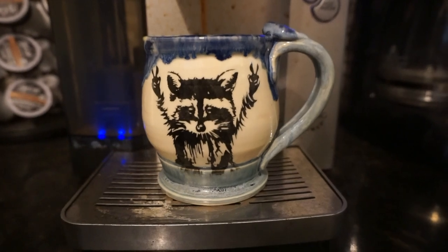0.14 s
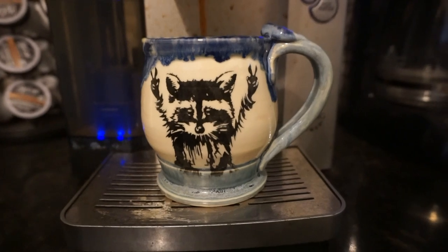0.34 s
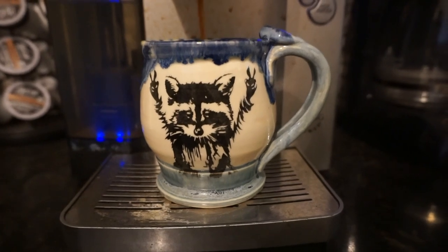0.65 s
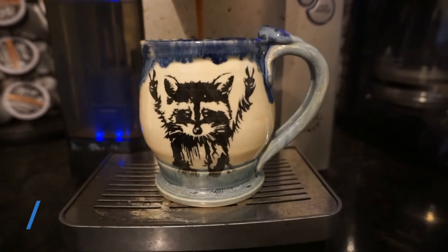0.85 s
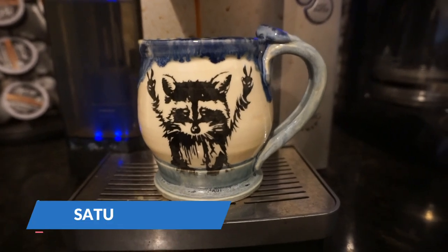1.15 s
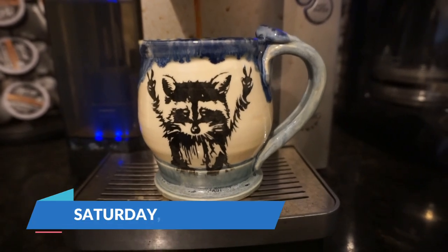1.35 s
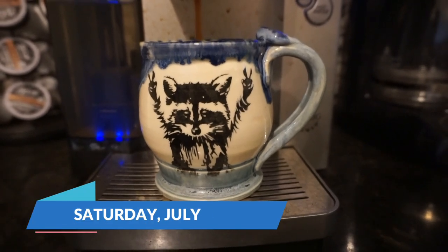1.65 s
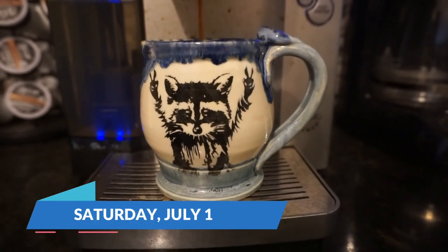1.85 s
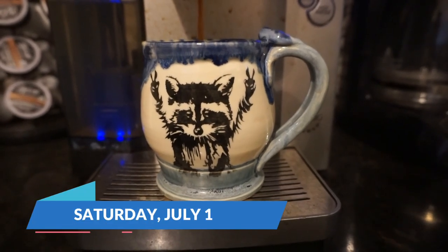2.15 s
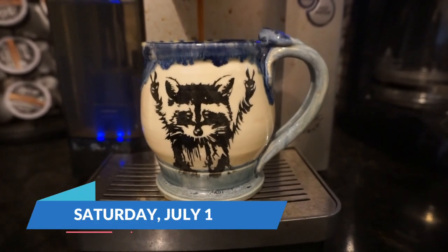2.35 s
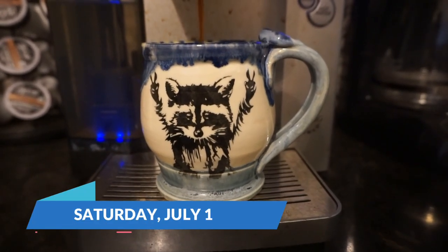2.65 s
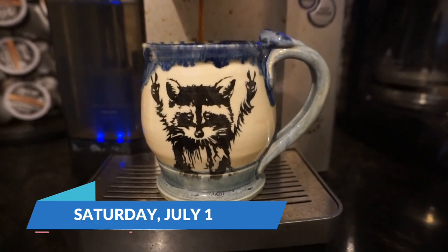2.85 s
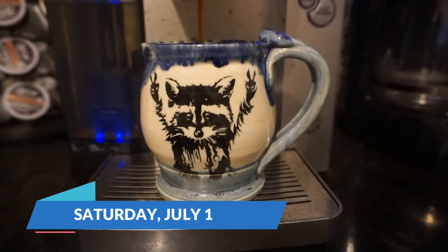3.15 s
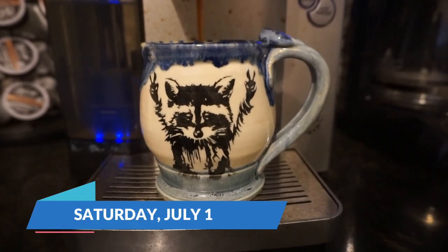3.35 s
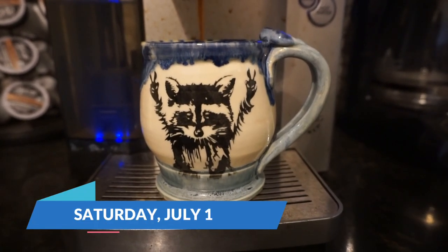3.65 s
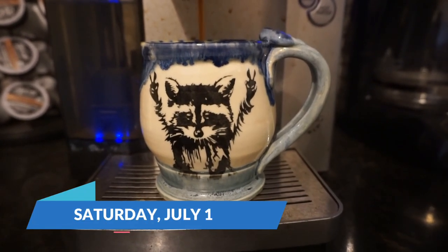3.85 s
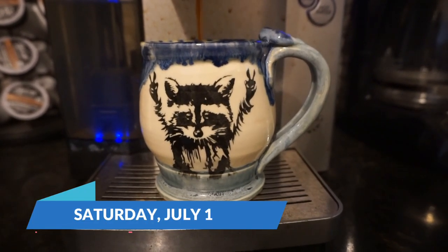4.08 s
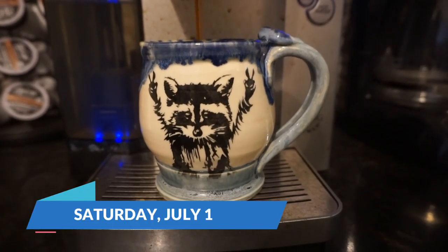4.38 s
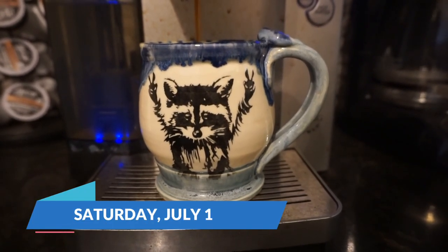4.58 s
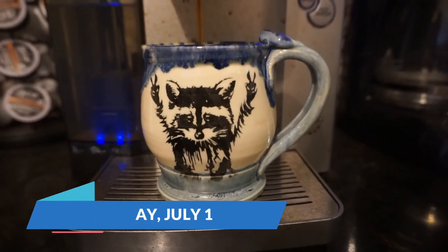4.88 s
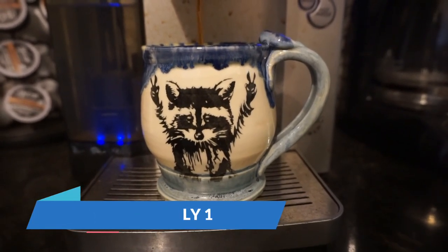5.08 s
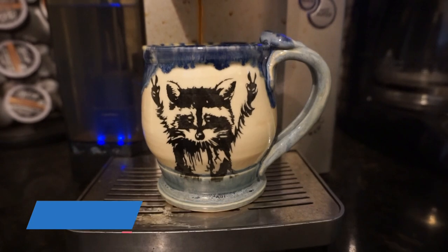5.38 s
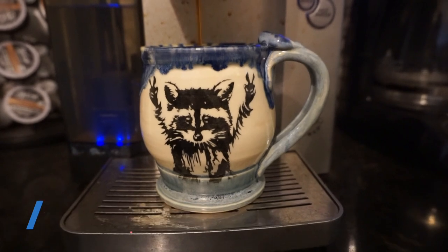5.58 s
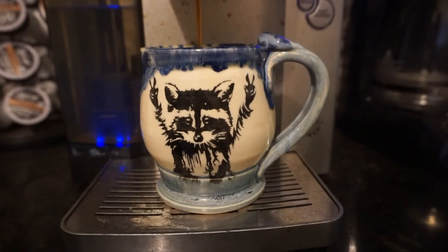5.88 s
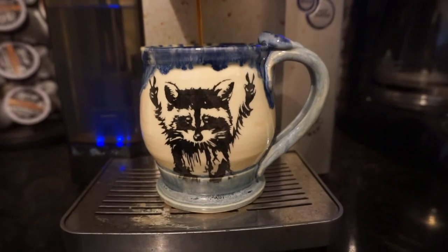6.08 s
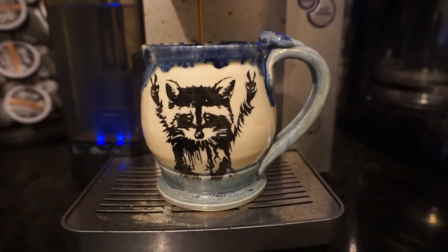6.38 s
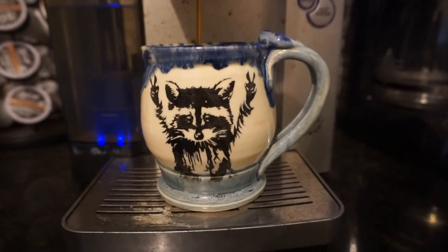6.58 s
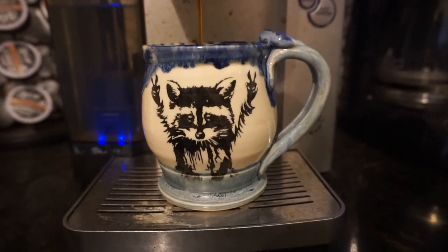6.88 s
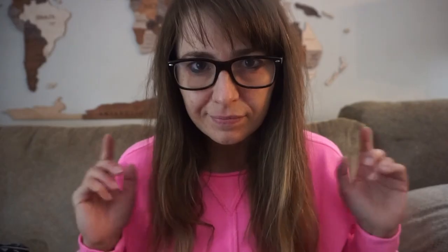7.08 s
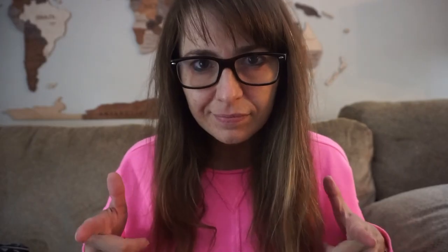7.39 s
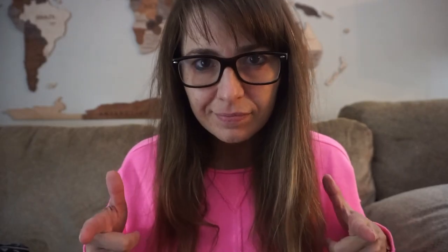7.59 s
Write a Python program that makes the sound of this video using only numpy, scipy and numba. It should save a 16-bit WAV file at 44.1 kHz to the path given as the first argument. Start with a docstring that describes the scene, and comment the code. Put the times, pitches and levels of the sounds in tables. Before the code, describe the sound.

A close, slightly wide stereo kitchen sound. From 0 s a thin stream of coffee strikes the bare bottom of a ceramic mug: a bright, uneven spatter with tiny spits of spray, briefly breaking and swelling, and overlapping gurgling notes that ring inside the vessel. A low, gently wavering pump hum and soft room tone continue underneath. Around 1.4 s a stronger gurgle and a first rounder plop stand out; from 1.8 to 3 s the hiss recedes as a pool deepens. From about 2.5 s hollow, mid-pitched bubble plops arrive in dense irregular clusters, each short with a slight upward bend, mixed with sharp little drips and splashes. They stay busy from 3 to 6.9 s, with slight lulls after 6 s. The echoes are short and hard. At about 7 s the pour and hum cut off suddenly, leaving a faint, soft living-room tone with a barely audible low hum until the end.

```python
"""In a kitchen, close up, a thin stream of coffee falls into a ceramic mug; near the end we cut to a quiet living room.
First the stream spatters on the bare bottom: shaped noise, swarms of tiny grains and gurgling bubble notes.
Then it plunges into the pool: short decaying sines plop, drip and spit, and the mug's resonances colour them.
The brewer's pump hums as six wavering tones over noise for room tone; the living room is soft noise and one hum."""
import sys
import numpy as np
from scipy import signal
from scipy.fft import rfft, irfft, next_fast_len
from scipy.io import wavfile
from scipy.ndimage import uniform_filter1d
from numba import njit

SR = 44100
rng = np.random.default_rng(int(sys.argv[2]) if len(sys.argv) > 2 else 0)


def field_ratio(decibels):
    """Amplitude ratio for a level in dB (20 dB per decade); scalars and array-likes work."""
    return 10 ** (np.asarray(decibels, dtype=float) / 20)


def waveform_to_disk(signal):
    """Save audio, clipped to [-1, 1], as 16-bit WAV at the path in sys.argv[1]."""
    frames = np.transpose(np.atleast_2d(signal))
    scaled = np.clip(frames, -1, 1) * 32767
    samples = np.round(scaled).astype(np.int16)
    wavfile.write(sys.argv[1], SR, samples)


N = 340829

# Large bubbles trapped by the stream, ahead of the mug: (nominal peak time [s], strength [dB], starting pitch [Hz])
PLOPS = [(0.733, -18, 1120), (0.82, -17.5, 1090), (1.091, -19, 870), (1.371, -11.5, 575),
         (1.512, -15.5, 600), (1.76, -19, 755), (2.0, -20, 800), (2.054, -18, 746), (2.066, -16, 1120),
         (1.808, -21, 990), (2.125, -18.5, 830), (2.16, -9.5, 850), (2.188, -17.5, 825), (2.42, -18, 830),
         (2.549, -6.5, 807), (2.588, -11.5, 920), (2.609, -10, 757), (2.638, -7, 774), (2.784, -23, 1190),
         (2.799, -13.5, 740), (2.849, -22, 1190), (3.084, -21, 760), (2.92, -7, 750), (2.937, -9.5, 794),
         (2.959, -9.5, 760), (2.973, -9.5, 744), (2.996, -13, 780), (3.103, -12.5, 620), (3.132, -18, 710),
         (3.229, -9, 695), (3.292, -19, 720), (3.32, -14, 780), (3.328, -15, 820), (3.341, -6.5, 830),
         (3.426, -10.5, 800), (3.447, -12, 766), (3.469, -13, 750), (3.526, -15.5, 776), (3.593, -15, 777),
         (3.614, -15.5, 730), (3.631, -5, 662), (3.699, -15.5, 800), (3.728, -16, 750), (3.872, -5.5, 736),
         (3.896, -12, 740), (3.916, -14.5, 774), (3.998, -11, 750), (4.102, -12, 820), (4.119, -4.5, 766),
         (4.151, -10, 755), (4.206, -11.5, 755), (4.244, -9, 790), (4.263, -7.5, 774), (4.298, -13, 755),
         (4.328, -12.5, 774), (4.346, -17, 760), (4.378, -12.5, 747), (4.466, -13, 754), (4.518, -12, 760),
         (4.531, -21, 810), (4.573, -4.5, 682), (4.602, -11, 755), (4.651, -12, 810), (4.732, -18, 785),
         (4.746, -6, 630), (4.764, -4.5, 620), (4.788, -10.5, 630), (4.824, -6.5, 817), (4.839, -11.5, 850),
         (4.922, -16, 700), (4.977, -7.5, 740), (5.045, -12.5, 700), (5.055, -10.5, 697), (5.117, -6, 763),
         (5.14, -15, 686), (5.147, -9.5, 790), (5.194, -5, 650), (5.233, -6, 660), (5.267, -6, 776),
         (5.284, -10, 632), (5.368, -6.5, 714), (5.392, -14, 850), (5.409, -10, 800), (5.447, -5, 658),
         (5.471, -8.5, 650), (5.497, -5.5, 670), (5.577, -15, 737), (5.59, -15, 746), (5.966, -17, 760),
         (5.603, -7.5, 666), (5.706, -16, 760), (5.728, -13.5, 733), (5.753, -20, 730), (5.792, -7, 557),
         (5.834, -15.5, 674), (5.866, -19, 746), (6.275, -20, 755), (6.294, -20, 764), (5.815, -14.5, 780),
         (5.9, -16, 760), (5.92, -8, 750), (5.951, -7.5, 784), (5.982, -4.5, 734), (6.055, -10.5, 720),
         (6.101, -11, 714), (6.19, -13, 725), (6.215, -14, 675), (6.329, -15.5, 744), (6.46, -22, 680),
         (6.483, -6, 743), (6.518, -8, 704), (6.551, -13.5, 770), (6.579, -11.5, 780), (6.593, -9.5, 600),
         (6.606, -16.5, 750), (6.638, -12, 760), (6.762, -9.5, 620), (6.771, -11.5, 697),
         (6.794, -6.5, 670), (6.815, -12.5, 740), (6.84, -12.5, 850), (6.71, -20, 750), (6.728, -22, 745),
         (6.889, -19, 756), (6.909, -19, 760), (6.947, -17.5, 724), (6.42, -21, 740), (4.5, -18, 1120),
         (6.039, -17.5, 1020), (6.929, -16, 776), (6.978, -5, 912)]
# Small bubbles and droplets, ahead of the mug: (nominal peak time [s], strength [dB], starting pitch [Hz])
DROPS = [ (0.771, -11, 4600), (0.792, -10.5, 2950), (0.94, -15, 4000), (1.042, -16, 2090),
         (1.175, -12, 2180), (1.298, -14.5, 2520), (1.43, -11.5, 2240), (1.536, -8, 4830),
         (1.807, -7, 2450), (1.808, -16, 4000), (1.885, -11, 2570), (2.157, -11.5, 2350),
         (2.418, -12, 3120), (2.499, -17, 2630), (2.635, -14.5, 2460), (2.723, -12.5, 3400),
         (2.782, -9.5, 3400), (3.317, -16.5, 2520), (3.365, -11.5, 3380), (3.697, -12.5, 4000),
         (3.791, -12, 3640), (3.981, -13.5, 2600), (3.994, -20, 3800), (4.099, -9.5, 3540),
         (4.148, -12.5, 3300), (4.822, -18, 3730), (4.885, -19, 2250), (4.907, -21, 2270),
         (5.153, -16.5, 2570), (5.342, -19, 2950), (6.213, -18.5, 2230), (5.703, -17, 3880),
         (5.751, -19, 3740), (5.917, -11, 3170), (6.149, -24.5, 3870), (6.054, -11.5, 2850),
         (6.728, -15.5, 2950), (1.112, -14, 2540), (1.24, -14.5, 2560), (2.034, -16, 3950),
         (2.25, -15.5, 2640), (2.465, -20, 2550), (2.586, -21, 2650), (2.681, -16, 4000),
         (2.847, -18.5, 2530), (2.994, -19, 2600), (3.129, -23, 3600), (3.424, -22, 2600),
         (3.544, -19.5, 2610), (3.59, -22.5, 2150), (3.628, -18, 3020), (4.203, -27, 2650),
         (5.114, -25, 2620), (5.231, -22, 2870), (5.263, -20, 2800), (5.283, -18.5, 4000),
         (5.331, -21, 3680), (5.366, -20, 3200), (5.617, -20, 4000), (5.809, -18.5, 1720),
         (5.883, -22, 2780), (5.948, -16, 4000), (6.481, -18, 2500), (6.576, -20, 3950), (6.792, -23, 2370),
         (6.885, -20.5, 2880), (6.976, -15.5, 4000)]
# Bursting spray, ahead of the mug: (nominal time [s], strength [dB], starting pitch [Hz])
SPITS = [(0.1765, -20, 15360), (0.2613, -25, 14900), (0.2982, -14.5, 9900), (0.3998, -12, 8640),
         (0.437, -21, 9170), (0.6843, -25, 12100), (0.8629, -27, 12000), (0.9053, -23, 9800),
         (1.033, -26, 8000), (1.0605, -37, 13900), (1.08, -13, 13980), (1.1117, -15.5, 12000),
         (1.1388, -19, 9750), (1.2371, -26, 9260), (1.2955, -26, 11940), (1.3673, -34, 10000),
         (1.3847, -20, 8350), (1.5334, -26, 7970), (1.6372, -9.5, 14300), (1.7379, -21, 10200),
         (1.7873, -26, 14400), (1.9184, -21, 8360), (2.0338, -21, 8120), (2.1425, -22.5, 7750),
         (2.1765, -20, 12600), (2.4628, -28, 10200), (2.5671, -32, 12600), (2.6342, -28, 10200),
         (2.6663, -20.5, 10400), (2.7797, -25, 8460), (2.846, -31, 12100), (3.079, -24.5, 9970),
         (3.2122, -21, 8000), (3.2776, -27, 8250), (3.3354, -28, 8500), (3.422, -28, 9800),
         (3.459, -30.5, 8100), (3.788, -18, 8300), (3.8553, -30, 8140), (4.0976, -19, 9260),
         (4.146, -23.5, 10200), (4.1674, -17, 11920), (4.2009, -21.5, 8330), (4.2391, -11, 12080),
         (4.3415, -28, 9620), (4.4113, -30.5, 10000), (4.5472, -24, 8120), (4.8197, -22, 7700),
         (5.261, -24, 10200), (5.3637, -30, 8050), (5.6116, -30, 7900), (5.8451, -28, 9350),
         (5.8943, -22.5, 9170), (5.9155, -22, 9150), (5.9459, -22, 14030), (5.976, -24.5, 10140),
         (6.0354, -26.5, 8000), (6.1469, -28, 15400), (6.2694, -22, 9100), (6.3764, -31, 10200),
         (6.4093, -30, 14400), (6.479, -26.5, 9690), (6.5743, -24, 8590), (6.7898, -22.5, 10100),
         (6.9026, -29, 8180), (6.9431, -25.5, 10000), (6.974, -18, 8700)]
# Steady rush of the stream, base levels ahead of flicker and mug: (time [s], churn [dB], spatter [dB])
STREAM = [(0.0, -34, -33.5), (0.19, -29.5, -31.5), (0.5, -28.5, -30.5), (1.1, -26.5, -30.5),
          (1.22, -26, -33.5), (1.45, -26, -37.5), (1.7, -28.5, -37.5), (1.9, -31, -38), (2.3, -32.5, -42),
          (3.5, -34, -42), (4.2, -32.5, -42), (5.8, -36, -48), (6.95, -36.5, -45)]
# Resonances of mug and brewer alcove: (frequency [Hz], width [Hz], relative level [dB], left minus right [dB])
MUG_RESONANCES = [(630, 46, 1.5, 1), (755, 61.4, 6.5, 2.6), (1021, 223, 2, -2.5), (1068, 65.4, 8.5, 0),
                  (1190, 53, 6.5, -2.5), (1260, 157, 4.5, -0.5), (1926, 547, 3, 0.5), (2428, 152, 3, -7),
                  (2637, 46, 9.5, 3), (2950, 186, 6, -1), (3276, 235, -7.5, -23.5), (3540, 76, 2.5, -1),
                  (4000, 136, 7.5, 0.5), (4830, 263, 4.5, -3), (6136, 590, 3, 2), (7090, 120, 4, -8),
                  (7810, 610, 0.5, 5), (9550, 760, -4, -11.5), (10020, 250, 3.5, 0), (12260, 2040, 0, -1.5),
                  (13900, 2430, 3.5, -3.5), (15400, 5200, -2.5, -7)]
# Noise spectrum of the churning pool: (frequency [Hz], relative density [dB per Hz])
CHURN_SPECTRUM = [(300, 5), (600, 2), (1200, -8), (1600, -8), (2500, -16.5)]
# Noise spectrum of the spattering stream: (frequency [Hz], relative density [dB per Hz])
SPATTER_SPECTRUM = [(1200, 10), (2000, 6.5), (3000, 8), (4500, -2), (6000, -42.5), (16000, -33)]
# Pump tones: (frequency [Hz], mean rms level [dB])
PUMP_TONES = [(93, -69), (118.4, -62.5), (149, -69.5), (188.4, -65), (296.1, -62.5), (419.9, -54.5)]
# Room tone of the kitchen: (frequency [Hz], relative density [dB per Hz])
KITCHEN_SPECTRUM = [(20, -11.5), (60, -6.5), (110, 2.5), (250, 3.5), (500, 6), (1000, 4), (2500, -55.5),
                    (6000, -29), (16000, -45.5)]
# Room tone of the living room: (frequency [Hz], relative density [dB per Hz])
LOUNGE_SPECTRUM = [(12, -49.5), (20, -25.5), (58, -24.5), (72, -20), (93, -12), (120, -15.5), (210, -20.5),
                   (270, -14.5), (410, -22), (897, -17), (1450, -18), (4500, -28.5), (13900, -41),
                   (16000, -48)]
# Finest spray, base level ahead of flicker and mug: (time [s], level [dB])
MIST_LEVEL = [(0, -50), (1.6, -46), (2.6, -53.5), (7, -51.5)]
# The thin stream breaks up or thickens for a moment and the rush drops or swells:
# (time [s], half length [s], spatter change [dB], churn change [dB])
BREAKS = [(.192, 0.031, 6.5, 0), (0.344, 0.02, 5, -0.5), (.437, 0.016, 5, 0), (0.628, .018, 3.5, 1),
          (0.534, 0.034, -1, -1.5), (0.247, 0.013, -6, -4), (0.31, 0.0072, -13, -5), (0.397, .014, -11, -1),
          (.474, .014, -6, 3), (0.593, 0.026, -5, -0.5), (0.67, 0.011, -14, -2.5), (0.854, .018, -4, -2),
          (0.971, 0.012, -8, -11), (1.27, .02, -9, -2), (1.409, 0.019, 1, -2)]
# Air under the thin film gurgles in larger bubbles: (time [s], centre pitch [Hz], base level [dB])
LOW_GURGLE = [(0, 710, -64), (.33, 600, -29), (.7, 639, -29.5), (.95, 620, -33.5), (1.12, 600, -31.5),
              (1.19, 558, -30), (1.25, 647, -24.5), (1.42, 600, -33), (1.5, 623, -35), (1.7, 640, -28.5),
              (1.95, 696, -42)]
# The same in smaller bubbles: (time [s], centre pitch [Hz], base level [dB])
HIGH_GURGLE = [(0, 1144, -29.5), (.2, 1192, -27), (.6, 1134, -28), (1.15, 1130, -28.5), (1.3, 1075, -31),
               (1.4, 1080, -44), (1.46, 1138, -19), (1.55, 1170, -51), (1.95, 1160, -47)]

POOL_S = 1.84, 3.08  # the pool deepens from the first time to the second
CUT_S, FADE_S = 6.993, .006  # the kitchen is gone at CUT_S, after a fade this long


def level(x, db):
    """Scale to an rms level."""
    return x * field_ratio(db) / np.sqrt(np.mean(x ** 2))


def colour(points, channels=1):
    """Noise at unit rms, its spectrum drawn through (frequency [Hz], density [dB]) points on a log axis."""
    hz, db = np.transpose(points)
    size = next_fast_len(N)
    f = np.maximum(np.arange(size // 2 + 1) * SR / size, 1)
    noise = rfft(rng.standard_normal((channels, size)))
    shape = field_ratio(np.interp(np.log(f), np.log(hz), db))
    return level(irfft(noise * shape, size)[:, :N], 0)


def walk(rate):
    """Random levels held 1 / rate s and smoothed twice; spread about 0.7."""
    hold = int(SR / rate)
    steps = np.repeat(rng.standard_normal(N // hold + 1), hold)
    return uniform_filter1d(uniform_filter1d(steps, hold), hold)[:N]


def stereo(mid, side):
    """Left is the sum, right the difference."""
    return mid + side * np.array([[1], [-1]])


def tilt(pan_db):
    """Gains of left and right that lie pan_db apart."""
    return field_ratio(np.array([[.5], [-.5]]) * pan_db)


@njit
def ring(start, hz, cycles, rise, peak, glide, lean, sudden):
    """Sum of sine grains that swell over rise cycles, die over cycles, and bend in pitch by glide per life.

    sudden 1 decays exponentially, more cuts the tail short; lean shifts a grain sideways."""
    out = np.zeros((2, N))
    for k in range(len(start)):
        first = int(start[k])
        life, swell = cycles[k] * SR / hz[k], rise * SR / hz[k]
        phase = 0.
        for i in range(min(int(6 * life / sudden), N - first)):
            envelope = (1 - np.exp(-i / swell)) * np.exp(-(i / life) ** sudden)
            v = peak[k] * envelope * np.sin(phase)
            out[0, first + i] += v * (1 + lean[k])
            out[1, first + i] += v * (1 - lean[k])
            phase += min(2 * np.pi * hz[k] / SR * (1 + glide * i / life), 3.)
    return out


def events(table, cycles, rise, glide, lean, early_s, count=1, burst_s=0., scatter=0., rest_db=0.,
           sudden=1., uneven=0.):
    """Ring each row early_s ahead of its time: one grain as listed, then count - 1 strays within burst_s."""
    s, db, hz = np.repeat(table, count, axis=0).T
    stray = np.arange(len(s)) % count > 0
    u, v = rng.standard_normal((len(s), 4)).T, rng.random(len(s))
    start = np.maximum(s - early_s + stray * burst_s * v ** 2, 0) * SR
    # later strays are fainter, of either polarity
    stray_gain = np.sign(u[0]) * (1 - v) ** 1.22 * field_ratio(rest_db)
    peak = field_ratio(db) * np.where(stray, stray_gain, 1)
    hz = np.minimum(hz * np.exp(stray * scatter * u[1]), SR / 2.7)
    lives = cycles * np.exp(uneven * u[3])
    return ring(start, hz, lives, max(rise, .01), peak, glide, lean * u[2], max(sudden, 1.))


def with_lesser(table, per_s, top_db, range_db, hz, scatter, from_s=0):
    """The listed events, plus lesser ones at random moments from from_s up to the cut."""
    span_s = CUT_S - from_s
    count = int(per_s * span_s)
    u, v = rng.random((count, 2)).T, rng.standard_normal(count)
    lesser = zip(from_s + u[0] * span_s, top_db - range_db * u[1], hz * np.exp(scatter * v))
    return list(table) + list(lesser)


def swarm(gust, count, lo_hz, hi_hz, cycles, rise, range_db, lean):
    """Countless small grains at unit rms, many faint and few strong, stronger in the gusts."""
    u = rng.random((count, 4)).T
    start = u[0] * N
    hz = lo_hz * (hi_hz / lo_hz) ** u[1]
    size = field_ratio(range_db * u[2] ** 3) * gust[start.astype(int)]
    lives = np.full(count, 1. * cycles)
    return level(ring(start, hz, lives, max(rise, .01), size, 0.021, lean * (2 * u[3] - 1), 1.0), 0)


def air(points, db, side_db, bass_hz):
    """Room tone as coloured noise: alike at both ports in the bass, wider above."""
    mid, side = colour(points, channels=2)
    high_pass = signal.butter(1, bass_hz, "high", fs=SR, output="sos")
    return level(stereo(mid, field_ratio(side_db) * signal.sosfilt(high_pass, side)), db)


def pump():
    """Steady motor tones that waver a little in level and phase."""
    t = np.arange(N) / SR
    hum = np.zeros(N)
    for hz, db in PUMP_TONES:
        gain = np.sqrt(2) * field_ratio(db + 0.76 * walk(8.0))  # rms to peak
        hum += gain * np.sin(2 * np.pi * (hz * t + 0.31 * walk(5)))
    return hum


def breaks(t):
    """Level changes [dB] of spatter and churn while the stream is broken or thick, as bell-shaped bumps."""
    return sum(np.array([[spatter_db], [churn_db]]) * np.exp(-((t - s) / half_s) ** 2)
               for s, half_s, spatter_db, churn_db in BREAKS)


def churn(deep, gust):
    """Air under the thin film sings in long overlapping notes, then pool bubbles take over; noise beneath."""
    calm = np.ones(N)
    low = swarm(calm, count=500, lo_hz=478.5, hi_hz=667, cycles=6.4, rise=1.0, range_db=5.0, lean=0.042)
    high = swarm(calm, count=1800, lo_hz=954.0, hi_hz=1404, cycles=13.6, rise=1.5, range_db=6.5, lean=0.05)
    shallow = field_ratio(-6.5) * low + field_ratio(-8) * high
    bubbles = swarm(gust, count=1800, lo_hz=620, hi_hz=977, cycles=2.27, rise=0.27, range_db=18.0, lean=0.093)
    noise = field_ratio(-6 + 3.5 * walk(90)) * colour(CHURN_SPECTRUM)
    return (1 - deep) * shallow + deep * bubbles + noise


def spatter(deep, gust):
    """Wide hiss of the stream, with grains of splash that come forward as the pool deepens."""
    mid, side = colour(SPATTER_SPECTRUM, channels=2)
    hiss = field_ratio(-1.5 - 3 * deep) * gust * stereo(mid, 0.45 * side)
    grains = swarm(gust, count=2500, lo_hz=1895, hi_hz=5400, cycles=2.8, rise=0.059, range_db=21, lean=0.7)
    return hiss + field_ratio(-12 + 9 * deep) * grains


def rush(t, deep, gust, dip_db):
    """Churn and spatter follow the stream; the spatter comes in surges, stronger over the pool."""
    s, churn_db, spatter_db = np.transpose(STREAM)
    surge_db = (1.36 + deep) * 1.6 * walk(14)
    churn_gain = field_ratio(np.interp(t, s, churn_db) + dip_db[1])
    spatter_gain = field_ratio(np.interp(t, s, spatter_db) + dip_db[0] + surge_db)
    return churn_gain * churn(deep, gust) + spatter_gain * spatter(deep, gust)


def mist(t, gust):
    """Finest spray: a wide swarm of very short treble grains that flickers."""
    spray = swarm(gust, count=1100, lo_hz=5500, hi_hz=17700, cycles=1.45, rise=0.054, range_db=28.5, lean=0.93)
    return field_ratio(np.interp(t, *np.transpose(MIST_LEVEL)) + 5.5 * walk(25)) * spray


def gurgle(curve, count, cycles, scatter, range_db, share_db, pan_db):
    """Short overlapping bubbles whose pitch and strength follow the curve, until the pool drowns them."""
    s, hz, db = np.transpose(curve)
    u, v = rng.random((count, 3)).T, rng.standard_normal(count)
    at = u[0] * s[-1]
    drowning = np.clip((s[-1] - at) / 0.23, 0, 1)
    size = field_ratio(np.interp(at, s, db) + share_db + range_db * u[1] ** 2) * drowning
    pitch = np.interp(at, s, hz) * np.exp(scatter * v)
    notes = ring(at * SR, pitch, cycles * (.5 + u[2]), 1.0, size, -0.042, 0 * at, 1.45)
    return notes * tilt(pan_db)


def spits():
    """Bursting spray: clusters of very short treble grains, spread wide."""
    table = with_lesser(SPITS, per_s=6, top_db=-31.5, range_db=23.5, hz=11998.5, scatter=0.9)
    return events(table, cycles=2.6, rise=0.13, glide=0.037, lean=0.49, early_s=-0.00062, count=16,
                  burst_s=0.0098, scatter=0.312, rest_db=2.0)


def drops():
    """Small bubbles and droplets: short bright blips in loose clusters."""
    table = with_lesser(DROPS, per_s=10, top_db=-30, range_db=8, hz=3100, scatter=0.25)
    return events(table, cycles=1.92, rise=0.34, glide=0.024, lean=0.27, early_s=0.001218, count=6,
                  burst_s=0.0073, scatter=0.3, rest_db=-5)


def plops():
    """Large trapped bubbles ring briefly as their pitch climbs; lesser ones join over the deep pool."""
    table = with_lesser(PLOPS, per_s=26, top_db=-23, range_db=8, hz=750, scatter=0.13, from_s=POOL_S[1])
    return events(table, cycles=3.3, rise=0.2, glide=0.06, lean=0.043, early_s=0.0048, sudden=1.4, uneven=0.18)


def slaps():
    """The drop that traps each large bubble slaps the surface, harder or softer, just after the plop's onset."""
    luck = rng.standard_normal((len(PLOPS), 2))
    table = [(s, db - 31.5 + 8.5 * a, 3270 * np.exp(0.26 * b)) for (s, db, _), (a, b) in zip(PLOPS, luck)]
    return events(table, cycles=1.8, rise=0.078, glide=0.02, lean=0.22, early_s=0.0012, count=3,
                  burst_s=0.003, scatter=0.33, rest_db=-4.0)


def satellites():
    """A smaller bubble pinches off beside each large one in the pool, fainter as foam gathers."""
    luck = rng.standard_normal((len(PLOPS), 2))
    fade_db_per_s = 4.5
    table = [(s, db - 16 - fade_db_per_s * s + 10.5 * a, 975 * np.exp(0.079 * b))
             for (s, db, _), (a, b) in zip(PLOPS, luck) if s > POOL_S[0]]
    return events(table, cycles=5.0, rise=0.15, glide=0.095, lean=0.115, early_s=0.00451)


def mug(x):
    """Every resonance, a decaying one-pole ring, reaches the two microphone ports with its own level."""
    out = np.zeros((2, N))
    for k, (hz, width, db, pan_db) in enumerate(MUG_RESONANCES):
        pole = np.exp((2j * hz - width) * np.pi / SR)
        polarity = (-1) ** k
        z = polarity * 2 * (1 - abs(pole)) * signal.lfilter([1], [1, -pole], x)
        out += field_ratio(db) * tilt(pan_db) * z.imag
    # the rim and the alcove largely cancel each other here
    notch_hz, notch_width_hz = 1760, 330
    notched = signal.lfilter(*signal.iirnotch(notch_hz, notch_hz / notch_width_hz, fs=SR), out)
    out = .2 * out + .8 * notched
    # little below about 380 Hz comes through
    return signal.sosfilt(signal.butter(4, 380, "high", fs=SR, output="sos"), out)


def pour():
    """The stream, spray and bubbles sound through the mug; the gurgle is heard directly."""
    t = np.arange(N) / SR
    deep = np.interp(t, POOL_S, [0, 1])
    # the stream wobbles, so the steady rush flickers
    gust = field_ratio((2.5 + 1.4 * deep) * walk(70))
    dip_db = breaks(t)
    stream = rush(t, deep, gust, dip_db) + mist(t, gust)
    notes = gurgle(LOW_GURGLE, count=70, cycles=17.2, scatter=0.0396, range_db=12.0, share_db=-4.5, pan_db=0.7)
    notes += gurgle(HIGH_GURGLE, count=200, cycles=15.8, scatter=0.072, range_db=11.5, share_db=-7, pan_db=-2.0)
    splashes = spits() + drops() + plops() + slaps() + satellites()
    return field_ratio(dip_db[1]) * notes + mug(stream + splashes)


def counter(x):
    """Short dense echoes off counter and tiles: decaying noise, different at each port."""
    room_db, t60_s = -17, 0.14
    t = np.arange(int(.15 * SR)) / SR
    tail = rng.standard_normal((2, len(t))) * field_ratio(-60 * t / t60_s) * (t > .002)
    tail = tail / np.sqrt(np.sum(tail ** 2, axis=1, keepdims=True))
    return x + field_ratio(room_db) * signal.fftconvolve(x, tail, axes=1)[:, :N]


def living_room(t):
    """Soft room tone, a little heavier on the right, and a thin steady hum."""
    tone = air(LOUNGE_SPECTRUM, -54.5, side_db=-1.0, bass_hz=298) * field_ratio(np.array([[-2.5], [0.4]]))
    return tone + field_ratio(-65) * np.sin(2 * np.pi * 89 * t)


def scene():
    """The kitchen, then a quick cut to the living room."""
    t = np.arange(N) / SR
    kitchen = air(KITCHEN_SPECTRUM, -47, side_db=-7.5, bass_hz=600) + pump() + counter(pour())
    before = np.clip((CUT_S - t) / FADE_S, 0, 1)
    after = np.clip((t - CUT_S - .003) / 0.024, 0, 1)
    return kitchen * before + living_room(t) * after


def band_limit(x):
    """A steep low-pass at the top of the band."""
    return signal.sosfilt(signal.butter(12, 16800, fs=SR, output="sos"), x)


def record(dry):
    """The recorder cuts the top with a steep low-pass at 15.8 kHz."""
    low_pass = signal.ellip(8, .3, 45, 15800, fs=SR, output="sos")
    mix = signal.sosfilt(low_pass, dry)
    return band_limit(mix)


dry = scene()
out = record(dry)
waveform_to_disk(out)
```